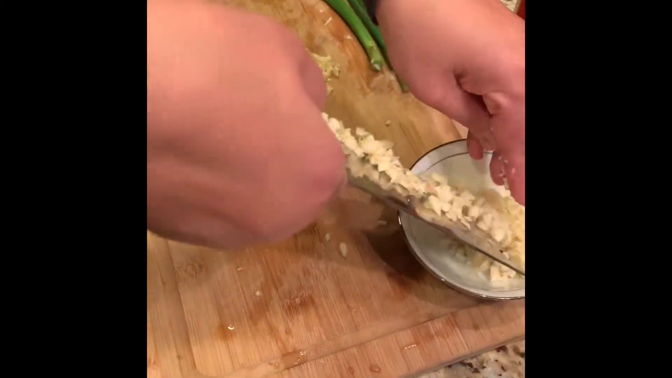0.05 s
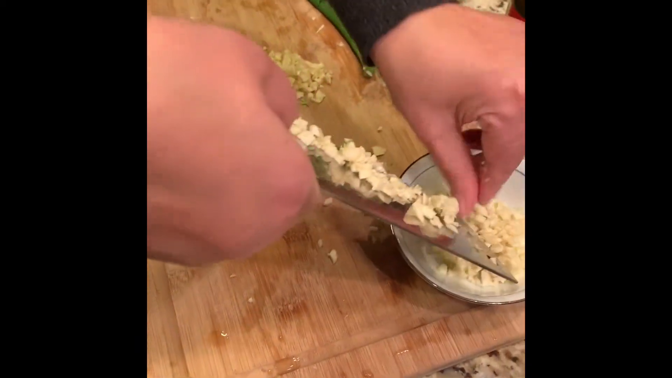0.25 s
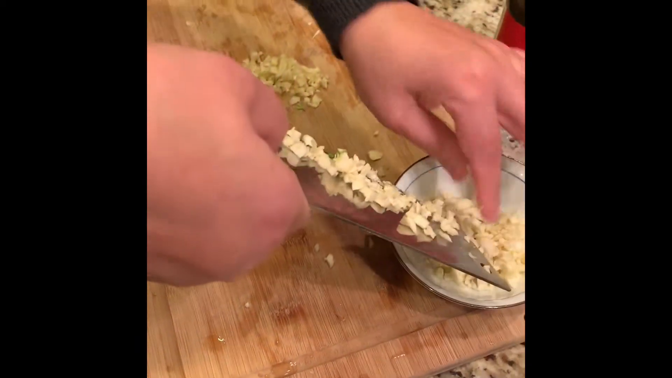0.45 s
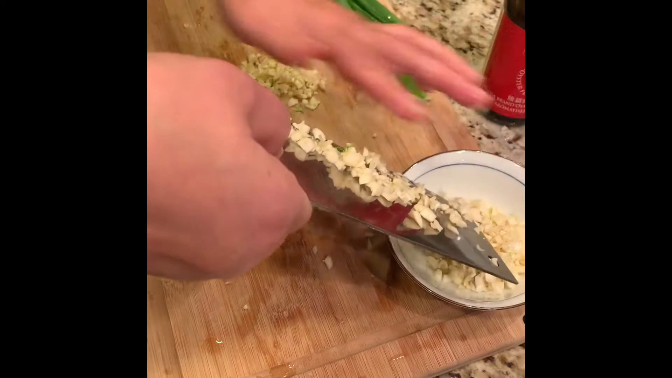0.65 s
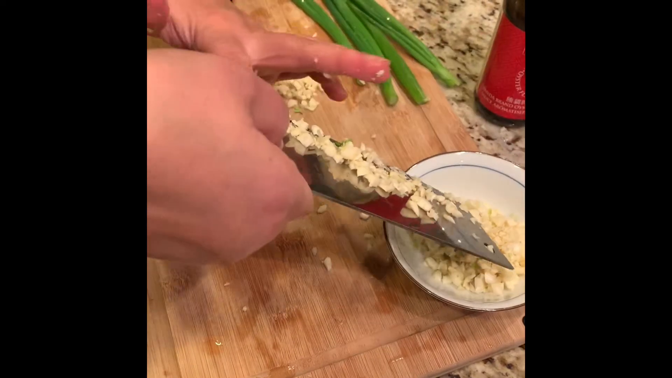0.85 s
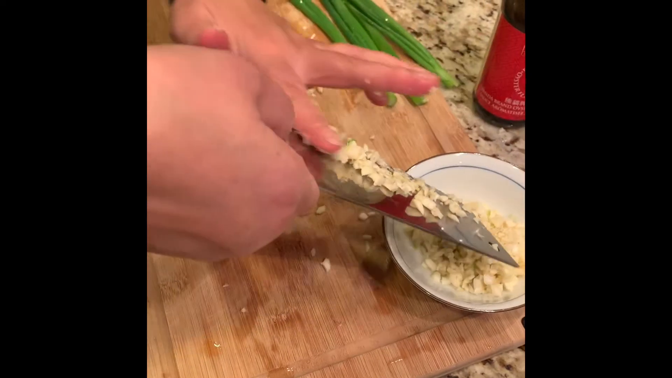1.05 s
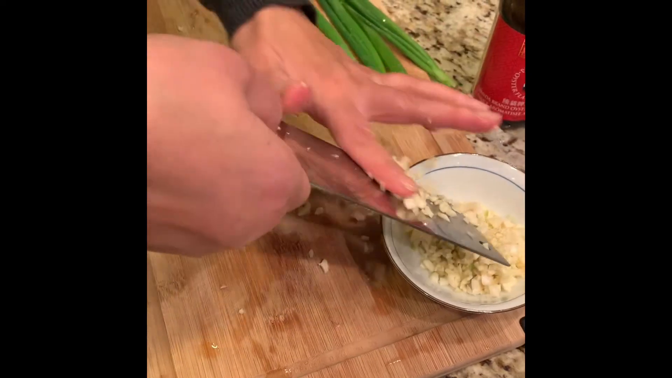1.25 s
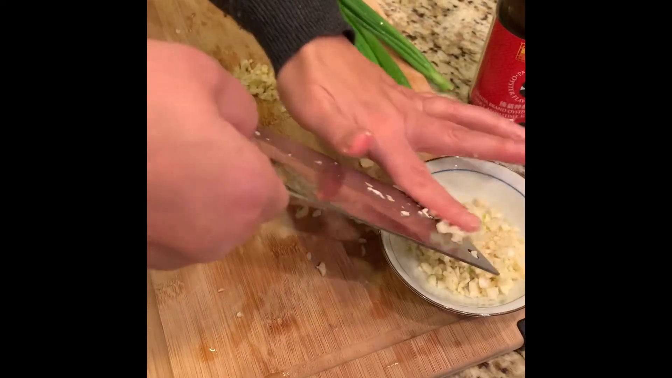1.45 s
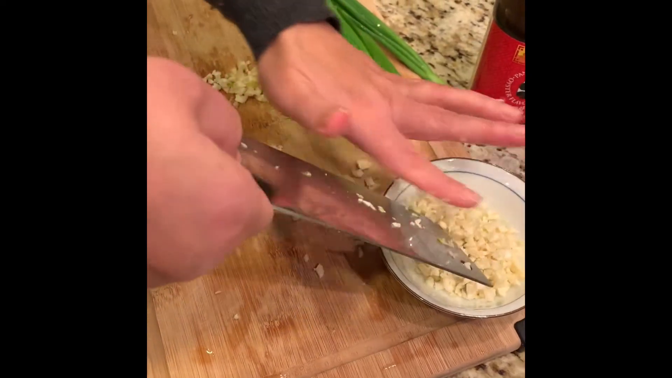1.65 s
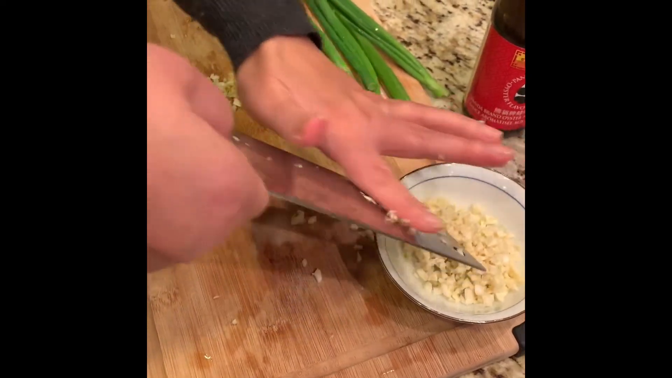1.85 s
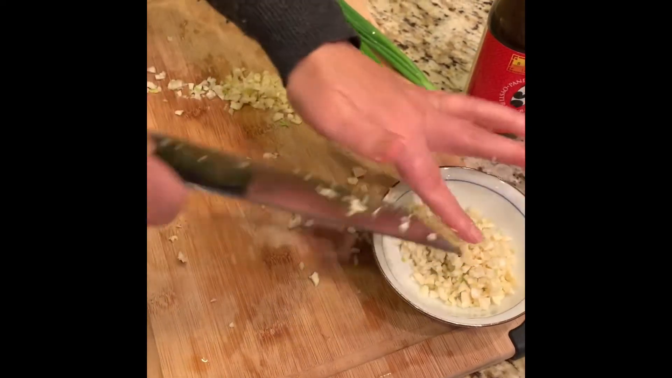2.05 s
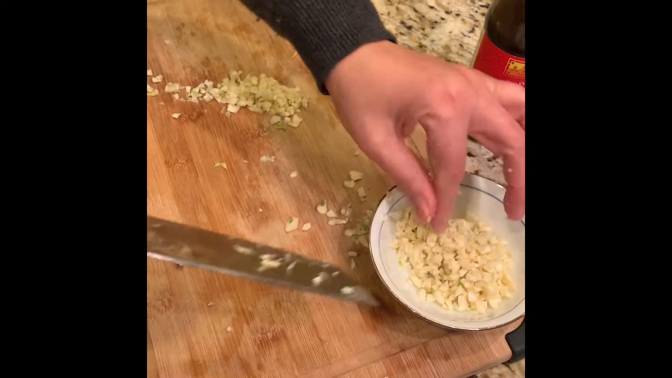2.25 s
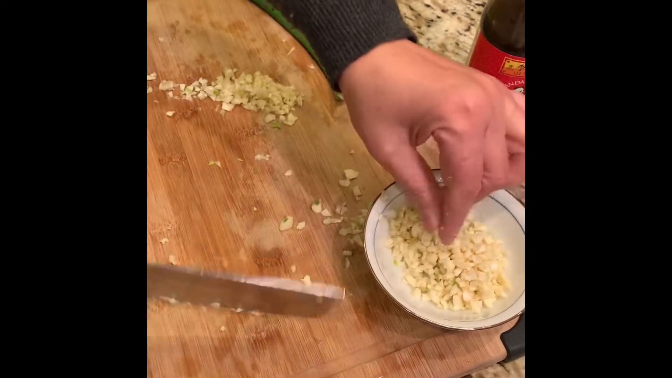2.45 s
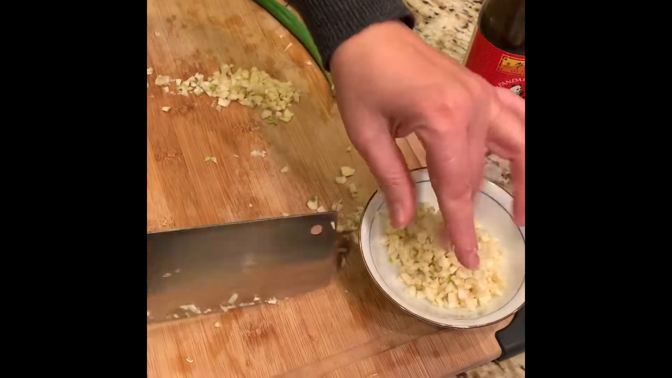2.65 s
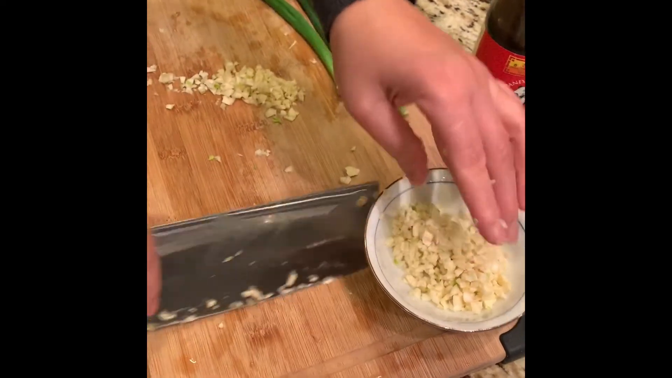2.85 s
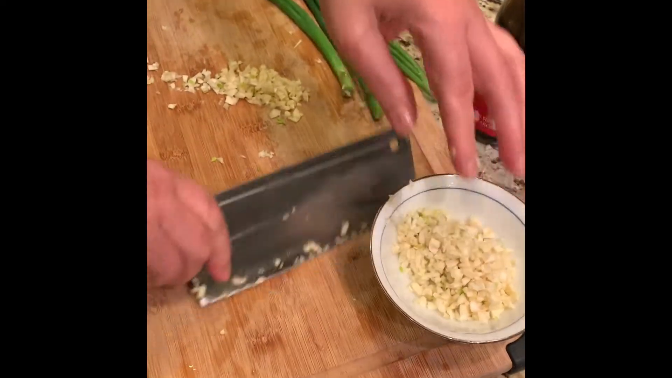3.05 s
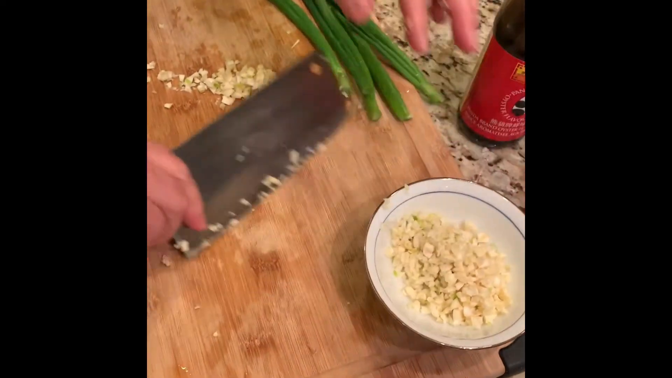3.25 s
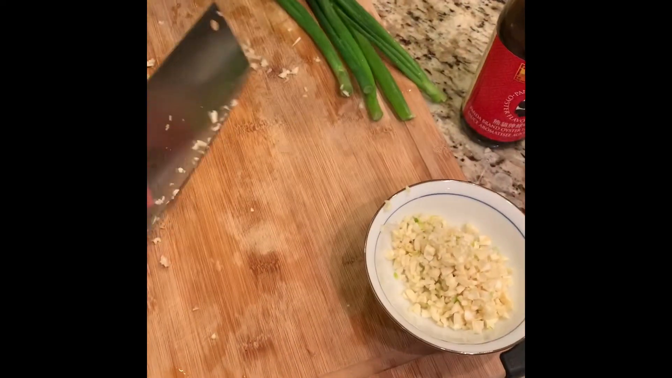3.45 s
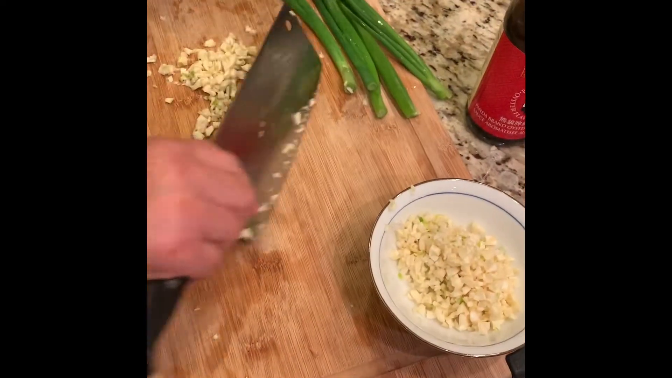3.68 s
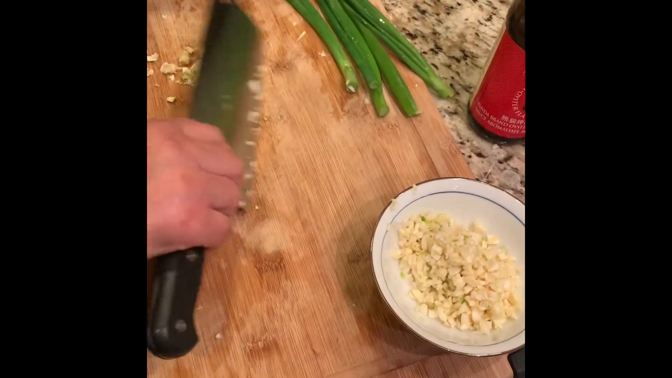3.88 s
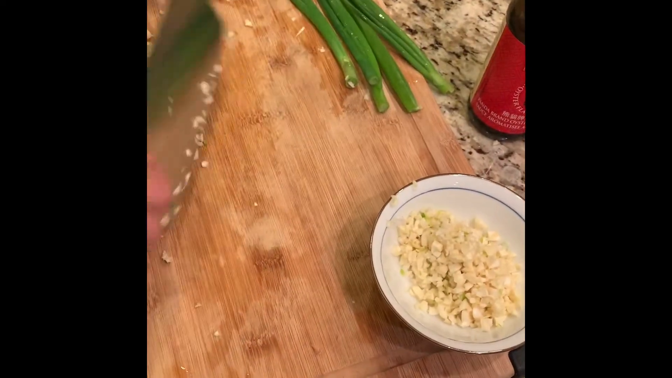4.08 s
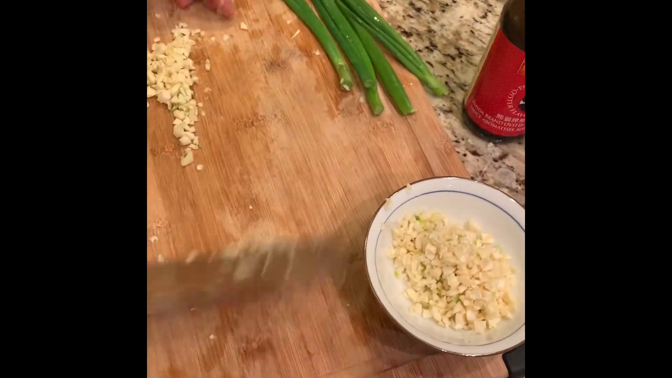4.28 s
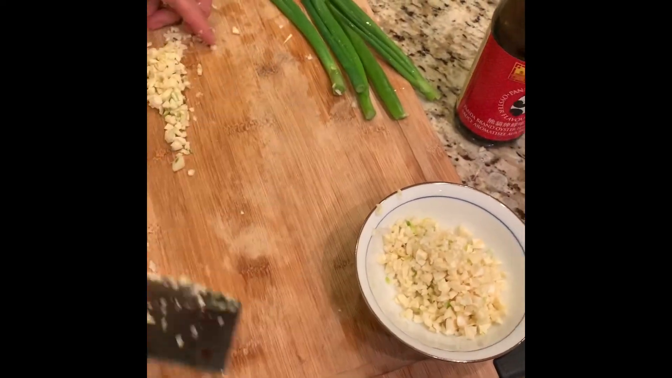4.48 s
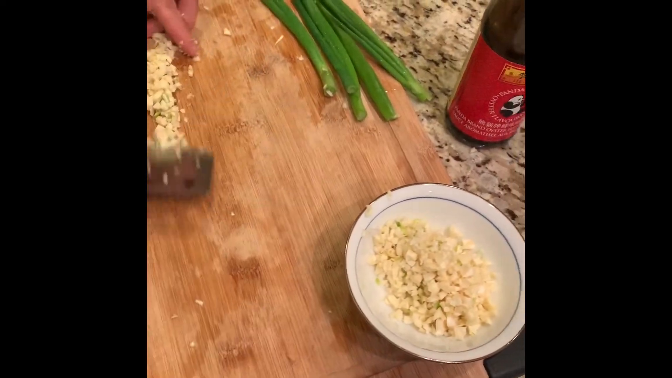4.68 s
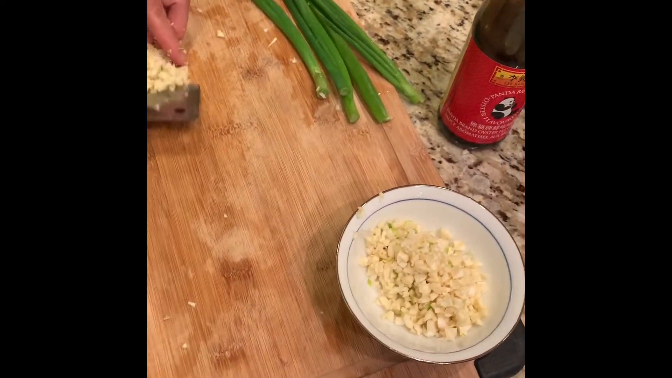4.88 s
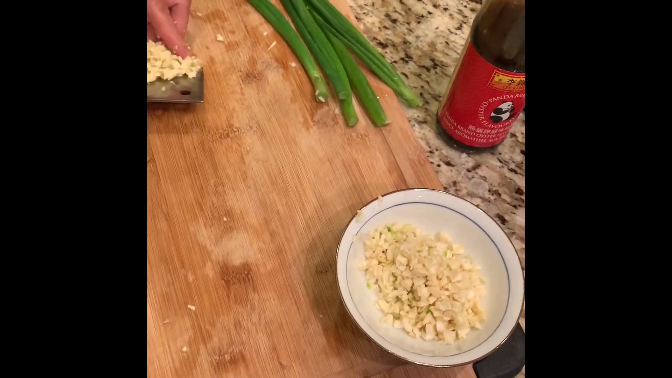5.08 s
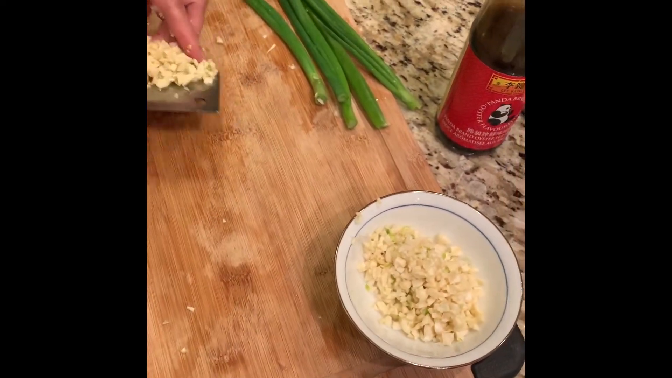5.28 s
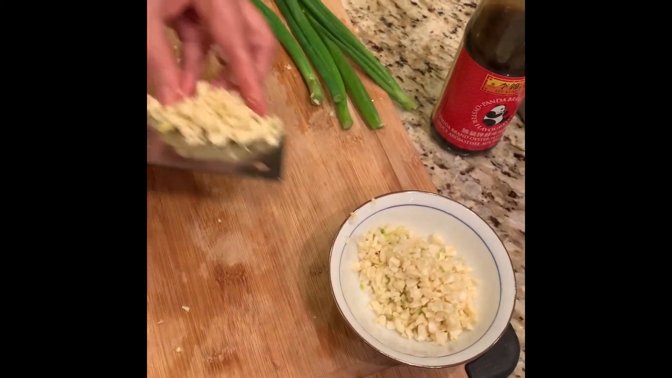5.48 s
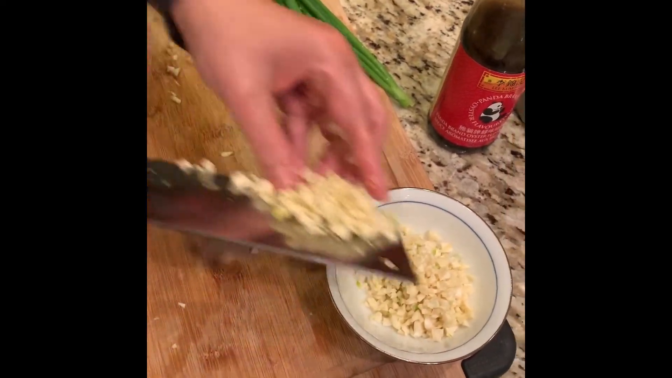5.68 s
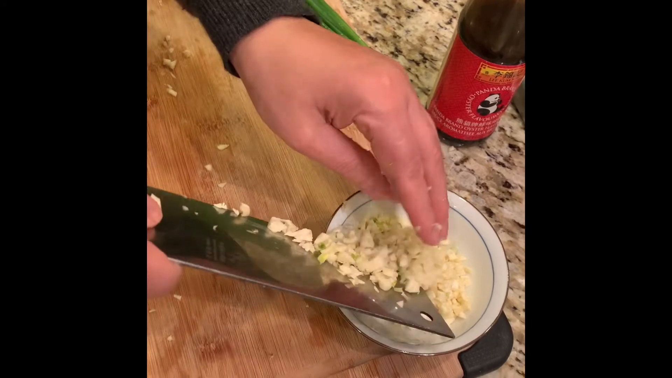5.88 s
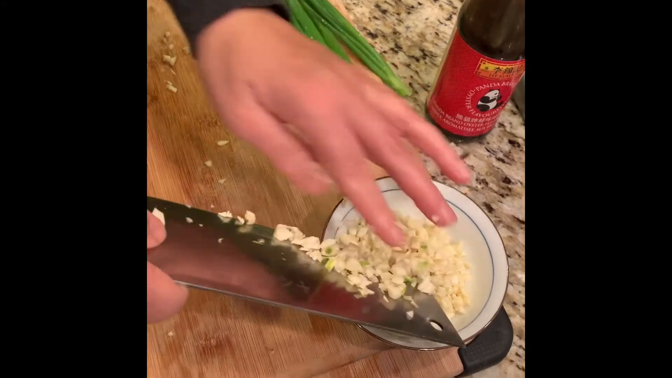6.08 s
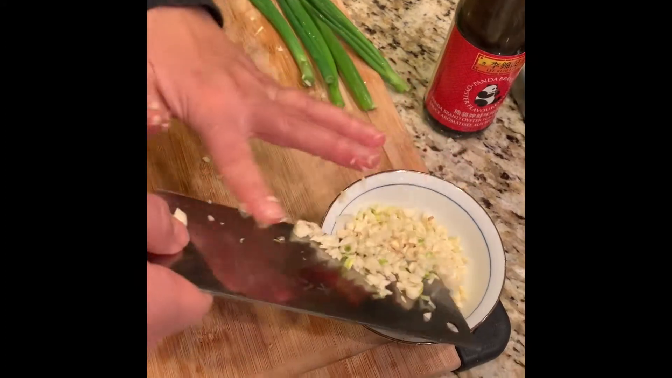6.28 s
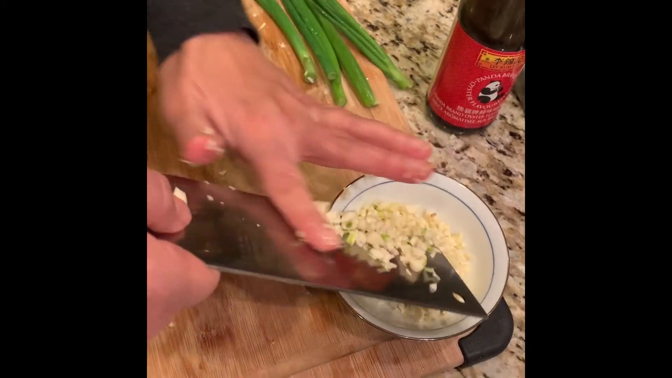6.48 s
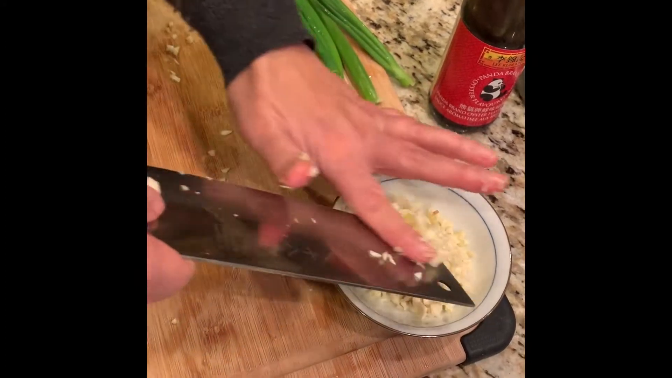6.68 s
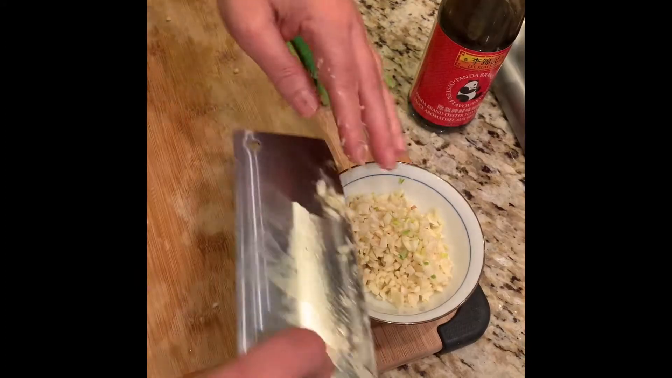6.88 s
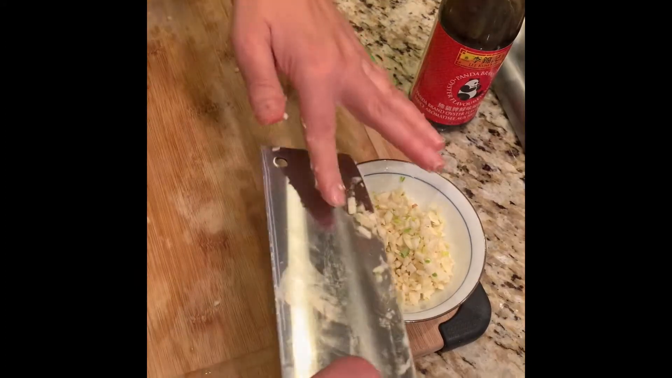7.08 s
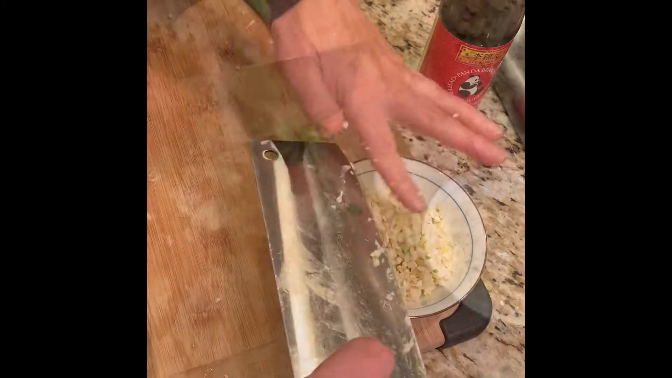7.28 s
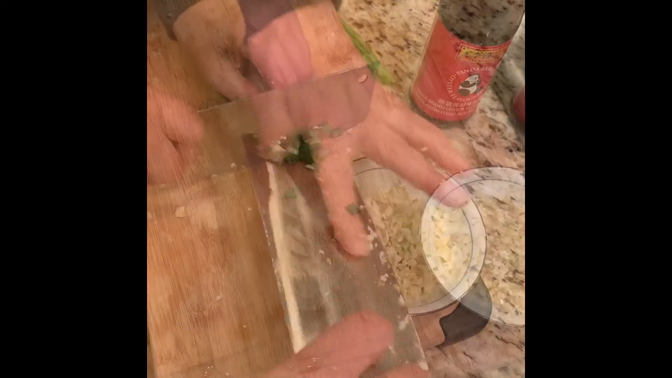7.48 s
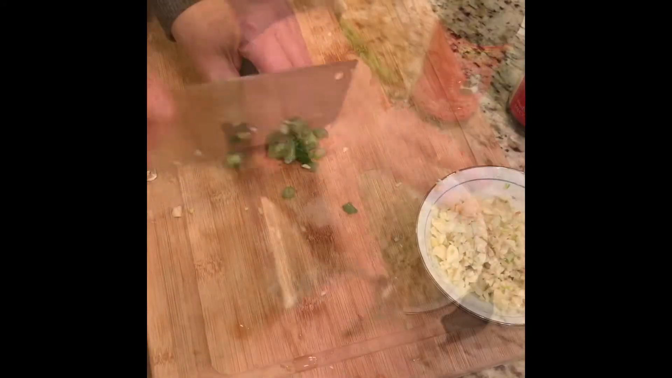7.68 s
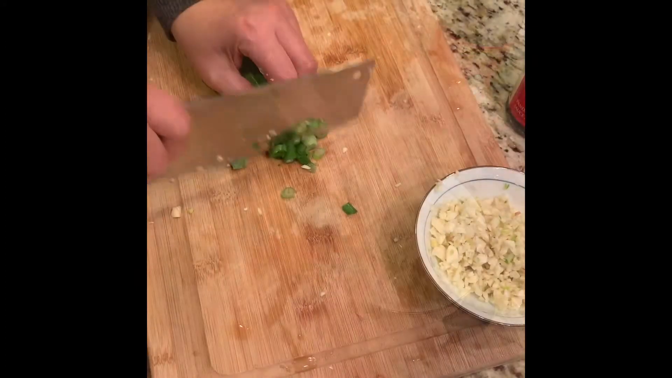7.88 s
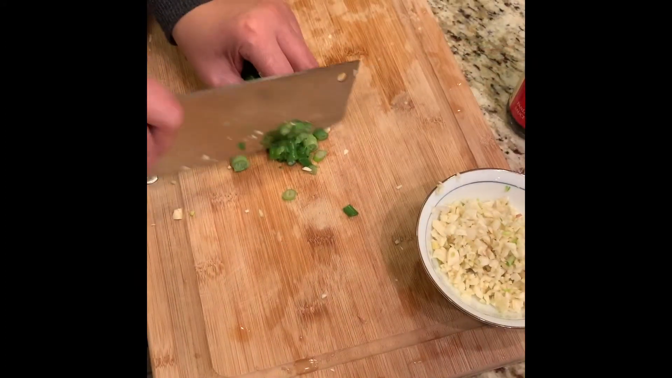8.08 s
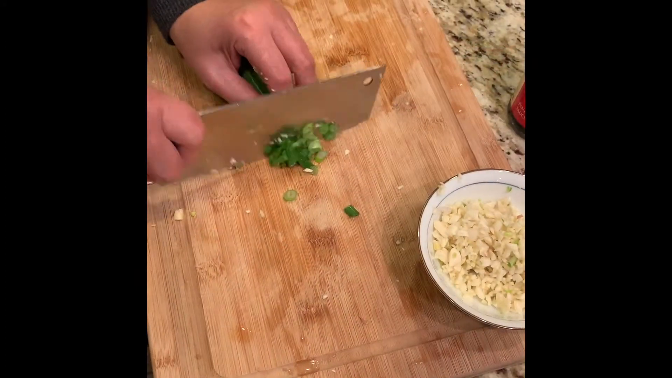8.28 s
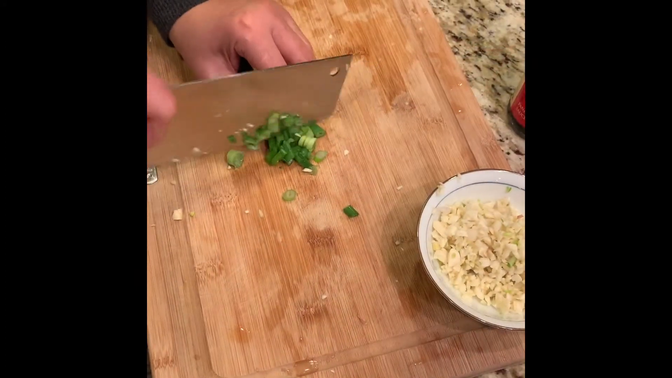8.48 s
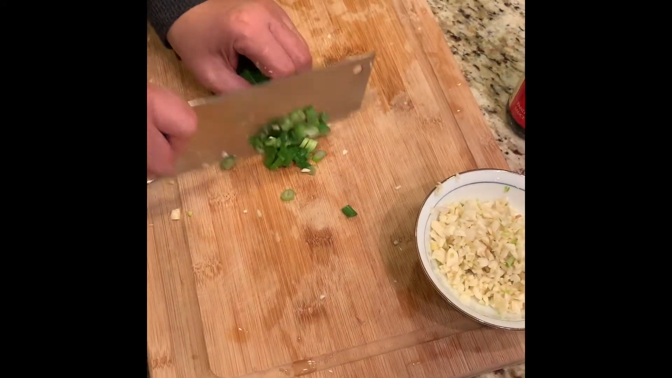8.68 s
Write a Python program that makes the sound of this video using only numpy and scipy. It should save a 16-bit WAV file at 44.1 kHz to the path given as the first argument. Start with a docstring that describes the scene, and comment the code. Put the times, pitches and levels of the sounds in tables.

```python
"""Cleaver at a wooden board

In a quiet kitchen, fingers wipe garlic off a blade into a china bowl. The blade is set down and scraped
over the board three times, then slices through green onions and lands on the wood with knocks.
Knocks and bowl are dying sines, rubbing is random grit shaped by wood and steel, small contacts are
noise bursts. Echoes, room tone and a refrigerator hum surround them, all heard at two microphone ports.
"""
import sys
import numpy as np
from scipy import signal
from scipy.fft import rfft, irfft, next_fast_len
from scipy.io import wavfile
from scipy.ndimage import uniform_filter1d

SR = 44100
rng = np.random.default_rng(int(sys.argv[2]) if len(sys.argv) > 2 else 0)


def materialize(psi):
    """Save the field psi as 16-bit PCM at rate SR to the path in sys.argv[1].

    A 1-D psi becomes a single channel; in a 2-D psi each row is a channel.
    """
    bounded = np.clip(np.atleast_2d(psi).T, -1, 1)
    quanta = np.round(bounded * 32767).astype(np.int16)
    wavfile.write(sys.argv[1], SR, quanta)


N = 385434  # length in samples

# The blade meets the wood. Each row: time in seconds, force in dB, upper board tones in dB,
# weight on the low board tones in dB, thump of the counter in dB.
KNOCKS = [(2.636, -16.5, -4.5, -23, -35.5), (3.691, -15.5, -5, -29.5, -35),
          (4.372, -16.5, -7, -27.5, -34.5), (4.42, -13, 9, -23.5, -47), (4.524, -19, 1, -25, -49.5),
          (4.605, -17.5, 4.5, -29, -50), (4.722, -6.5, 8, -29.5, -34.5), (4.863, -14, 5, -25, -43),
          (7.066, -32, -2, -51, -57), (7.415, -17.5, -6.5, -34.5, -44), (7.7208, -6.5, 1, -28, -42),
          (8.094, -4.5, -1.5, -27, -36), (8.506, -3.5, -3, -28.5, -35)]
# Tones of the board and the steel. Each row: pitch in Hz, share in dB, seconds to fall by 60 dB.
BOARD_MIDDLE = [(883, -0.5, 0.038), (1009.7, 5, 0.027)]
BOARD_UPPER = [(1265, 4.5, 0.016), (1538, 0, 0.029), (1827, -4.5, .02), (2230, -3, 0.009)]
BOARD_LOW = [(155, 0.5, 0.069), (220, -1, 0.073), (332, 0, 0.053), (499, -1, 0.085), (650, 0, 0.063)]
STEEL = [(3000, 0, 0.0055)]
STEEL_PING = [(3190, 0, 0.053)]
# Tones of the counter. Each row: pitch in Hz, seconds to fall by 60 dB.
COUNTER = [(61, 0.2), (88, 0.1)]
# The edge rubs along the wood. Each row: start in seconds, ramp to full speed in seconds, hold until
# the lift in seconds, steel hiss in dB, sag until the lift in dB, board rumble in dB, then the start
# and end of the singing pitch in Hz.
SCRAPES = [(2.66, .48, .235, -31, 0, -41, 750, 1700), (3.70, .12, .09, -28, 0, -40, 1500, 2300),
           (4.43, .075, .385, -33, -13, -43, 1300, 2200)]
# Plate tones of the sliding blade. Each row: pitch in Hz, width in Hz, share in dB.
BLADE_PLATE = [(187, 7.1, -13), (423, 19, -3.5), (881, 17, -2), (1240, 100, 5), (1585, 22, 2),
               (2070, 90, 9)]
# Tone colours of rubbing. Each row: frequency in Hz, relative level in dB.
HISS_COLOUR = [(300, -32.5), (1100, -14.5), (1600, 0), (2300, -2.5), (4000, 0.5), (7200, -4), (9300, -0.5),
               (10600, 0.5), (11300, -4.5), (16000, -8)]
RUMBLE_COLOUR = [(110, -23), (400, -1.5), (900, 3), (2000, -4), (4000, -12.5)]
CRUNCH_COLOUR = [(300, 9), (3000, 18), (16000, 17)]
# The edge crunches through onion stalks. Each row: start in seconds, seconds until the wood stops it,
# level in dB.
SLICES = [(7.035, 0.018, -58), (7.333, 0.057, -35.5), (7.668, 0.014, -42.5), (8.02, 0.052, -28),
          (8.412, 0.091, -30.5)]
# Cut stalks roll and rustle beside the blade. Each row: start in seconds, length in seconds, level in dB.
RUSTLES = [(7.1, 0.26, -63.5), (7.5, 0.28, -57.5), (7.73, 0.26, -63), (8.51, 0.025, -59)]
# The edge is dragged over the board, crumbs are pushed about. Each row: start in seconds,
# length in seconds, level in dB.
DRAGS = [(1.16, 0.14, -59.5), (3.98, 0.43, -58), (7.09, 0.21, -63), (7.76, .25, -42.5)]
# Fingers slide along the blade or rub together. Each row: start in seconds, length in seconds, level in dB.
WIPES = [(.94, 0.0078, -62), (2.06, 0.16, -79), (6.43, 0.287, -80)]
# Dull taps of fingers, handle and crumbs. Each row: time in seconds, level in dB.
TAPS = [(0.017, -35.5), (0.149, -40.5), (0.762, -46.5), (0.9, -62), (0.964, -60), (1.171, -45),
        (1.199, -45.5), (1.273, -46), (1.314, -37.5), (1.342, -41), (1.368, -48.5), (4.241, -53),
        (4.283, -49), (4.3, -43.5), (5.266, -54), (5.449, -48), (5.471, -46), (5.502, -44.5),
        (5.563, -46.5), (5.637, -57), (5.855, -53), (6.269, -50), (6.322, -53), (6.413, -57.5)]
# Bright sticky snaps of juice and stalk, and the sharp cracks of blows as the blade lands on the wood. Each
# row: time in seconds, level in dB.
SNAPS = [(4.1455, -44), (4.371, -25.5), (7.228, -48), (7.248, -45), (7.3492, -29), (7.496, -40),
         (7.5184, -28), (7.586, -34.5), (7.6465, -34), (7.6715, -30), (7.7212, -18.5), (7.912, -39),
         (7.999, -50), (8.1012, -18.5), (8.2326, -29.5), (8.4243, -24), (8.6208, -44), (8.631, -30),
         (8.678, -35.5)]
# A nail or the steel clicks. Each row: time in seconds, level in dB.
CLICKS = [(0.1499, -41.5), (1.0375, -57), (5.8082, -27.5), (7.9274, -35)]
# The steel is flicked. Each row: time in seconds, level in dB before the ping's own setting.
FLICKS = [(5.473, -39)]
# The blade touches the rim of the bowl. Each row: time in seconds, level in dB, overtones in dB,
# seconds until a touch damps it.
CLINKS = [(0.015, -58, -12.5, 0.12), (0.498, -75.5, 4.5, 0.043), (1.234, -48, -21.5, 0.15),
          (1.342, -53, -10, 0.11), (1.403, -62.5, 6, 0.011), (1.523, -61.5, -10, 0.04),
          (5.857, -72, -15.5, 0.19), (6.804, -62, -5, 0.036)]
# Tones of the china bowl. Each row: pitch in Hz, share in dB, seconds to fall by 60 dB.
BOWL = [(1526, 0, 0.55), (3664, -7, 1), (6600, -14.5, 0.12)]
# The work moves across the board. Each row: time in seconds, share of the mid band shifted to the left.
LEAN = [(6.95, 0.15), (7.049, -0.05)]
# Echoes of the kitchen. Each row: frequency in Hz, seconds to fall by 60 dB.
KITCHEN_DECAY = [(60, 0.49), (300, 0.29), (1100, 0.15), (4000, 0.088), (15000, 0.07)]
# Colour of the room tone. Each row: frequency in Hz, relative level in dB.
AIR_COLOUR = [(20, -20), (60, -8), (130, 2), (300, -3.5), (600, -7.5), (1500, -20.5), (4000, -25),
              (16000, -31)]
# How alike the room tone is on both sides. Each row: frequency in Hz, likeness where 1 is the same.
AIR_SAME = [(350, 1), (700, 0.55), (3000, 0.27), (4500, 1)]
# Phase of the room tone, right against left. Each row: frequency in Hz, turn in radians.
AIR_TURN = [(400, 0.5), (700, -5.5), (2100, -3), (3600, 0)]
# Refrigerator hum. Each row: pitch in Hz, level in dB.
HUM = [(60, -73), (120, -74)]
# Right port against left. Each row: frequency in Hz, phase in radians, level in dB.
PORTS = [(100, 0, 0), (600, 1, 3), (1000, .7, 4), (1600, -.3, 1.5), (2200, -1.2, .5), (3600, -1.6, 0),
         (4700, -np.pi, 0), (8950, -3 * np.pi, 0), (17500, -7 * np.pi, 0)]

# Blows: time constants in seconds, pitch spread as a share
CONTACT_S, GRAZE_S, ROLL_S, DETUNE = 0.00027, .008, 0.0022, .02
STEEL_DB, RATTLE_DB = -13, -20  # steel under the board's ring; small contacts around the main blow
GRAZE_DB, GRAZE_SLOPE = -54.5, 0.76  # a blow light on the low tones grazes more before it lands
SHUDDER_DB, SHUDDER_DB_PER_S = -27, 97  # blade and board chatter on after each blow, fading
CHATTER_DB, CHATTER_HZ = -10, (1100, 3500)  # blows rich in upper tones leave a wide chatter
# Scrapes: a stroke starts this far down; a bend of 1 is a straight ramp in dB
CREEP_DB, RISE_BEND = -29.5, 1
LIFT_S, TRAIL_DB, TRAIL_S = 0.018, -19.5, 0.08  # quick drop at the lift, then a faint trail
RUMBLE_SHARE, BUZZ_SHARE, BUZZ_DB = 1, 0.47, -3  # how far rumble and buzz follow the speed's dB; buzz level
BUZZ_FADE_S, STREAK_DB = 0.044, 6  # fade of the buzz after the lift; depth of plate streaks in the hiss
SING_DB, SING_WIDTH_HZ = -13, 150  # low-pass edge of the noise that makes the singing tone
# Slices, drags and wipes
SWELL_DB, SLICE_WOOD_DB = 14.5, -16.5  # growth of a slice; how strongly it presses through to the board
DRAG_HZ, SKIN_HZ = (790, 2140), (8000, 15500)
# Small contacts
SNAP_S, TAP_TOP_HZ, SNAP_TOP_HZ, CLICK_TOP_HZ = 0.0017, 4250, 14000, 7100
TAP_EDGE_DB, SNAP_BODY_DB, TAP_PING_DB = -8.5, -20, -16  # bright part of taps, dull part of snaps, steel
# Room and microphones
ROOM_ALIKE, AIR_DB, AIR_PATCH_DB = .45, -67.5, 2.2
LOW_CUT_HZ, TOP_HZ = 30, 15850


def knocks():
    """The edge grazes the wood, lands and rattles; the blow rings board, steel and counter."""
    out = np.zeros(N)
    t, slow = np.arange(-1300, 700) / SR, np.arange(SR // 2) / SR
    for s, db, upper_db, weight_db, thump_db in KNOCKS:
        graze = (t < 0) * amp(GRAZE_DB + GRAZE_SLOPE * (db - weight_db)) * np.exp(t / GRAZE_S)
        rattle = amp(RATTLE_DB) * np.exp(np.where(t < 0, 2 * t, -t / 1.7) / ROLL_S)
        blow = rng.standard_normal(len(t)) * (graze + rattle)
        blow[t == 0] = 1  # the main hit
        body = ring(BOARD_MIDDLE, .2, 0.83)
        body += amp(upper_db) * ring(BOARD_UPPER, .2, 0.97, DETUNE)
        body += amp(STEEL_DB) * ring(STEEL, .2, 0)
        sound = band(signal.fftconvolve(blow, body), 270, 14000)
        add(out, s + t[0], amp(db) * sound / abs(sound).max())

        low = ring(BOARD_LOW, .5, 1.4, 2 * DETUNE) * (1 - np.exp(-slow / 0.0014))
        add(out, s, amp(weight_db) * low)
        slab = [amp(-60 * slow / t60) * np.sin(2 * np.pi * hz * slow) for hz, t60 in COUNTER]
        thump = np.subtract(*slab) * (1 - np.exp(-slow / 0.018))  # the slab's two tones start opposed
        add(out, s, amp(thump_db) * thump)
    return out


def friction():
    """Everything that rubs: the scraped board, the chatter after blows, the cut stalks, the fingers."""
    rumble = colour(streaked(grit(9000, 0.8), 2.5, .08), RUMBLE_COLOUR)
    drag = dragged_wood(rumble)
    return scraping(rumble) + shudder(drag) + slicing(drag) + wiping()


def scraping(rumble):
    """Grit under the edge makes the steel hiss, the plate buzz and sing, and the board rumble."""
    hiss = colour(streaked(grit(11000, 3.0), STREAK_DB, 0.12), HISS_COLOUR)
    # a narrow resonance rings for long: turn each width into a decay time
    modes = [(hz, db, np.log(1000) / (np.pi * width)) for hz, width, db in BLADE_PLATE]
    plate = ring(modes, .2, 0)
    buzz = evened(streaked(signal.oaconvolve(grit(1500, 5.1), plate)[:N], 2.4, 0.075))
    steel, board, blade, sing = np.zeros((4, N))
    for start, ramp, hold, hiss_db, sag_db, rumble_db, from_hz, to_hz in SCRAPES:
        db = speed(ramp, hold, sag_db)
        t = np.arange(len(db)) / SR
        add(steel, start, amp(hiss_db + db))
        add(board, start, amp(rumble_db + RUMBLE_SHARE * db) * signal.windows.tukey(len(db), .1))
        buzz_fade = np.exp(-np.maximum(t - ramp - hold, 0) / BUZZ_FADE_S)
        buzz_level = amp(rumble_db + BUZZ_DB + BUZZ_SHARE * db)
        add(blade, start, buzz_level * signal.windows.tukey(len(db), .4) * buzz_fade)

        # one plate resonance climbs as the contact slides along the edge
        hz = np.interp(t, [0, ramp + hold], [from_hz, to_hz])
        slow_noise = signal.butter(2, SING_WIDTH_HZ, fs=SR)
        a, b = signal.lfilter(*slow_noise, rng.standard_normal((2, len(db))))
        tone = ((a + 1j * b) * np.exp(2j * np.pi * np.cumsum(hz) / SR)).real
        add(sing, start, amp(hiss_db + SING_DB + db) * evened(tone))
    return steel * hiss + board * rumble + blade * buzz + sing


def dragged_wood(rumble):
    """Grit under the dragged edge keeps the board ringing."""
    wood = ring(BOARD_MIDDLE, .2, 0) + ring(BOARD_UPPER, .2, 0)
    ringing = evened(signal.oaconvolve(grit(5000, 3.3), wood)[:N])
    return evened(band(ringing + 0.95 * rumble, *DRAG_HZ))


def shudder(drag):
    """After each blow blade and board chatter on, with a wider band that fades a little faster."""
    chatter = evened(band(grit(3000, 3.5), *CHATTER_HZ))
    (close, wide), t = np.zeros((2, N)), np.arange(SR // 2) / SR
    for s, db, upper_db, *_ in KNOCKS:
        add(close, s, amp(db + SHUDDER_DB - SHUDDER_DB_PER_S * t))
        wide_db = db + .5 * upper_db + SHUDDER_DB + CHATTER_DB
        add(wide, s, amp(wide_db - 1.128 * SHUDDER_DB_PER_S * t))
    return close * drag + wide * chatter


def slicing(drag):
    """Stalks crunch as many tiny breaks, and the cut and the drags press on the board."""
    crunch = colour(grit(9000, 3.8), CRUNCH_COLOUR)
    cut = strokes(SLICES, swell_db=SWELL_DB, fade=0.043)
    rustle = strokes(RUSTLES, swell_db=9.0, fade=0.029)
    pressed = amp(SLICE_WOOD_DB) * cut + strokes(DRAGS, swell_db=5.0, fade=0.016)
    return (cut + rustle) * crunch + pressed * drag


def wiping():
    """Wet skin sticks and slips as a thin, high crackle."""
    slips = band(grit(2500, 1.9), *SKIN_HZ)
    slide = evened(band(slips, *SKIN_HZ))  # twice, for steeper band edges
    return strokes(WIPES, swell_db=-0.5, fade=0.0071) * slide


def ticks():
    """Dry bursts join a dull knock of a few milliseconds to a bright snap; taps and flicks ping the steel."""
    out, t = np.zeros(N), np.arange(800) / SR
    rows = [(s, db, db + TAP_EDGE_DB, TAP_TOP_HZ) for s, db in TAPS]
    for table, top_hz in [(SNAPS, SNAP_TOP_HZ), (CLICKS, CLICK_TOP_HZ)]:
        rows += [(s, db + SNAP_BODY_DB, db, top_hz) for s, db in table]
    for s, dull_db, bright_db, top_hz in rows:
        a, b = rng.standard_normal((2, len(t)))
        dull = band(a * t * np.exp(-t / 0.0023), 920, 1600)
        bright = band(b * np.exp(-t / SNAP_S), 1900, top_hz)
        add(out, s, amp(dull_db) * dull / abs(dull).max() + amp(bright_db) * bright / abs(bright).max())
    for s, db in TAPS + FLICKS:
        add(out, s, amp(db + TAP_PING_DB) * ring(STEEL_PING, .1, 0, DETUNE))
    return out


def bowl():
    """China rings on three clear tones until a touch stops it."""
    out, t = np.zeros(N), np.arange(SR // 2) / SR
    for s, db, over_db, free in CLINKS:
        damped = np.exp(-np.maximum(t - free, 0) / 0.015)
        tones = ring(BOWL[:1], .5, 0) + amp(over_db) * ring(BOWL[1:], .5, 0)
        add(out, s, amp(db) * damped * tones)
    return out


def kitchen(x, alike):
    """Sparse echoes of random sign, each band dying at its own speed, partly shared by both ports."""
    taps = np.zeros((2, SR // 2))
    at = np.arange(200, SR // 2 - 20, 20) + rng.integers(0, 20, (2, (SR // 2 - 201) // 20))
    np.put_along_axis(taps, at, rng.choice([-1., 1.], at.shape), 1)
    hz, t, z = signal.stft(taps, SR, nperseg=256)
    a, b = signal.istft(z * amp(-60 * t / read(KITCHEN_DECAY, hz)[:, None]), SR, nperseg=256)[1]
    # long waves reach both ports alike
    b = signal.sosfilt(signal.butter(2, 250, "high", fs=SR, output="sos"), b)
    tail = np.array([a + (1 - alike) * b, a - (1 - alike) * b])
    return signal.fftconvolve(x[None], tail / np.linalg.norm(tail[0]), axes=1)[:, :N]


def air():
    """Room tone is noise with drifting patches; the refrigerator hum is wavering sines."""
    frames, hz = N // 256 + 5, np.fft.rfftfreq(1024, 1 / SR)
    a, b, c, d, patches = rng.standard_normal((frames, 513, 5)).T
    patches = evened(uniform_filter1d(uniform_filter1d(patches, 12, 0), 20, 1))
    same = np.clip(read(AIR_SAME, hz), -1, 1)[:, None]
    left = a + 1j * b
    right = same * left + np.sqrt(1 - same ** 2) * (c + 1j * d)
    right = right * np.exp(1j * read(AIR_TURN, hz))[:, None]
    z = np.array([left, right]) * amp(read(AIR_COLOUR, hz)[:, None] + AIR_PATCH_DB * patches)
    room = evened(signal.istft(z, nperseg=1024, noverlap=768)[1][:, :N])

    t, hum = np.arange(N) / SR, np.zeros(N)
    for f, db in HUM:
        waver = np.interp(t, np.arange(100) * 0.15, rng.standard_normal(100))
        hum += amp(db + 3 * waver) * np.sin(2 * np.pi * f * t + waver)
    return amp(AIR_DB) * room + hum


def ring(modes, length, spread_db, detune=0):
    """Dying sines build up over the contact; each blow varies the share and pitch of each one."""
    hz, db, t60 = np.transpose(modes)[:, :, None]
    t = np.arange(round(length * SR)) / SR
    hz = hz * (1 + detune * rng.standard_normal(hz.shape))
    share = amp(db + spread_db * rng.standard_normal(db.shape))
    tones = (share * amp(-60 * t / t60) * np.sin(2 * np.pi * hz * t)).sum(0)
    return tones * (1 - np.exp(-t / CONTACT_S)) / np.linalg.norm(share)


def grit(per_s, spread_db):
    """Rubbing is a rain of random slips of uneven size and sign."""
    size = amp(spread_db * np.minimum(rng.exponential(1, N), 5)) * rng.choice([-1, 1], N)
    return size * (rng.random(N) < per_s / SR)


def streaked(x, depth_db, hold):
    """Many narrow plate resonances come and go as the contact point travels."""
    z = signal.stft(x, nperseg=512)[2]
    field = uniform_filter1d(rng.standard_normal(z.shape), round(hold * SR / 256), 1)
    field = evened(uniform_filter1d(field, size=2, axis=0))
    return signal.istft(z * amp(depth_db * field))[1][:N]


def strokes(rows, swell_db, fade):
    """Loudness of strokes: each starts quickly, changes by swell_db to its end, and dies away unevenly."""
    out = np.zeros(N)
    for s, length, db in rows:
        t = np.arange(0, length + 0.44, 1 / SR)
        late = np.maximum(t - length, 0)
        level = amp(db + swell_db * np.minimum(t / length - 1, 0))
        add(out, s, level * np.minimum(t / 0.006, 1) * np.exp(-late / fade))
    points = N // 400 + 2
    uneven = np.interp(np.arange(N), np.arange(points) * 400, rng.standard_normal(points))
    return out * amp(3.5 * uneven)


def speed(ramp, hold, sag_db):
    """Level of one scrape below its top, in dB: a ramp up, a slow sag, a lift."""
    t = np.arange(0, ramp + hold + 0.32, 1 / SR)
    late = np.maximum(t - ramp - hold, 0)
    climb = CREEP_DB * np.clip(1 - t / ramp, 0, 1) ** RISE_BEND
    sag = sag_db * np.clip((t - ramp) / hold, 0, 1)
    drop = np.exp(-late / LIFT_S)
    trail = amp(TRAIL_DB) * (np.exp(-late / TRAIL_S) - drop)
    return climb + sag + 20 * np.log10(drop + trail)


def amp(db):
    """Turns dB into a plain factor."""
    return 10 ** (np.asarray(db) / 20)


def evened(x):
    """Sets the average strength (rms) to 1."""
    return x / np.sqrt(np.mean(x ** 2) + 1e-20)


def read(points, hz):
    """Reads a table of (Hz, value) between its rows, on a log frequency scale."""
    f, value = np.transpose(points)
    return np.interp(np.log(hz + 1), np.log(f + 1), value)


def add(mix, s, sound):
    """Adds a sound at s seconds, cut off at the end of the mix."""
    part = mix[round(s * SR):][:len(sound)]
    part += sound[:len(part)]


def colour(x, spectrum):
    """Filters by a spectrum in dB and sets the rms to 1."""
    return evened(irfft(rfft(x) * amp(read(spectrum, np.fft.rfftfreq(len(x), 1 / SR))), len(x)))


def band(x, lo_hz, hi_hz):
    """Keeps the frequencies between two edges."""
    return signal.sosfilt(signal.butter(2, [lo_hz, hi_hz], "band", fs=SR, output="sos"), x)


def scene():
    """Mixes the near sounds, leans their mid band sideways, and adds echoes and room tone."""
    hits, rub = knocks() + ticks() + bowl(), friction()
    near = hits + rub
    lean = np.interp(np.arange(N) / SR, *np.transpose(LEAN)) * band(near, 350, 2000)
    echoes = kitchen(amp(-7.5) * hits + amp(-12.0) * rub, alike=ROOM_ALIKE)
    return near + lean * [[1], [-1]] + echoes + air()


def record(dry):
    """The two ports differ in phase and level by frequency; deepest bass and highest treble are cut."""
    size = next_fast_len(N + 4096)
    hz, turn, db = np.transpose(PORTS)
    f = np.fft.rfftfreq(size, 1 / SR)
    # each port takes half of the difference, in opposite directions
    half = np.exp(.5j * np.interp(f, hz, turn)) * amp(.5 * np.interp(f, hz, db))
    dry = signal.sosfilt(signal.butter(4, LOW_CUT_HZ, "high", fs=SR, output="sos"), dry)
    ports = irfft(rfft(dry, size) * np.array([1 / half, half]), size)[:, :N]
    top_cut = signal.firwin(511, TOP_HZ, window=("kaiser", 9), fs=SR)
    return signal.oaconvolve(ports, top_cut[None], "same")


dry = scene()
out = record(dry)
materialize(out)
```